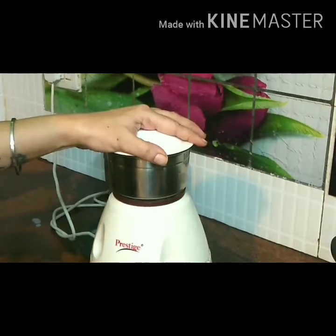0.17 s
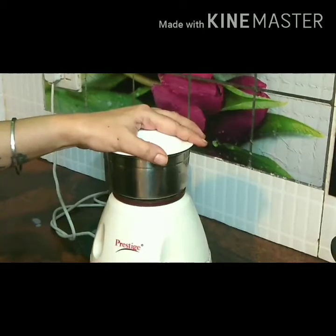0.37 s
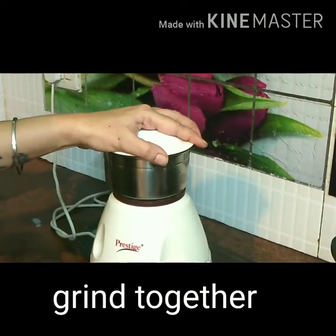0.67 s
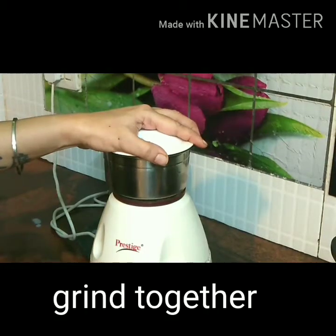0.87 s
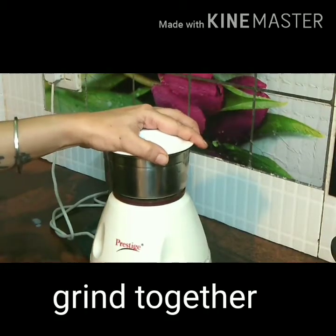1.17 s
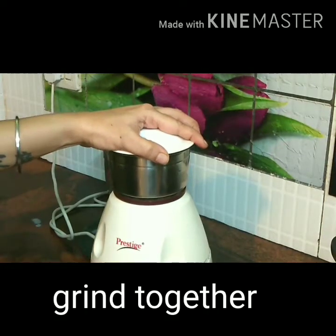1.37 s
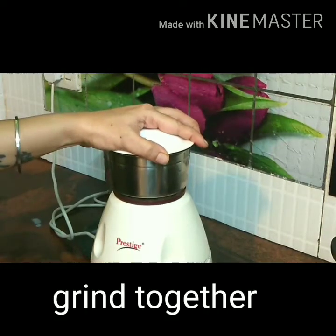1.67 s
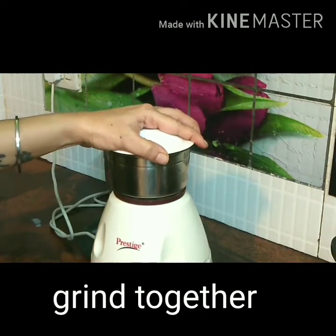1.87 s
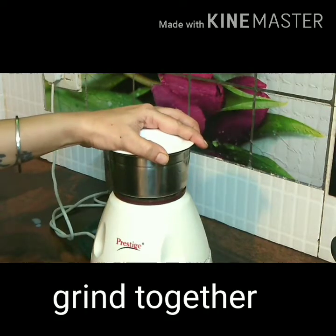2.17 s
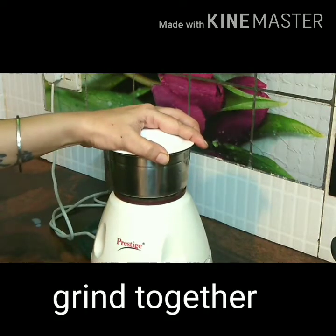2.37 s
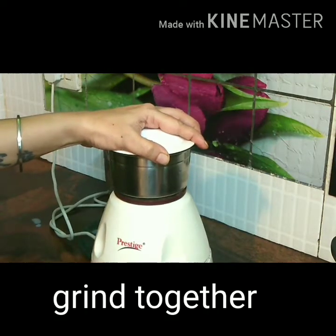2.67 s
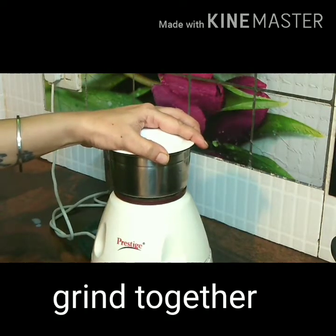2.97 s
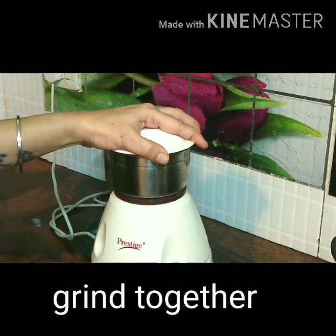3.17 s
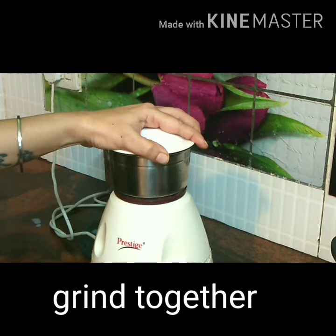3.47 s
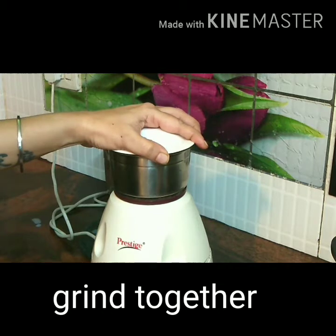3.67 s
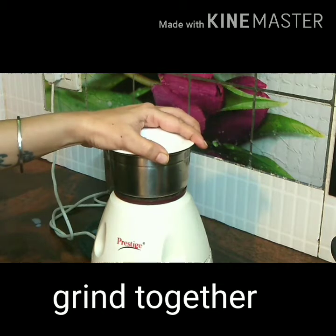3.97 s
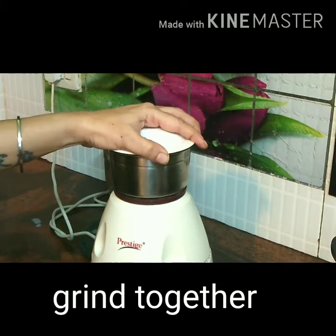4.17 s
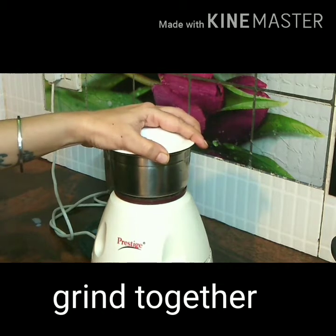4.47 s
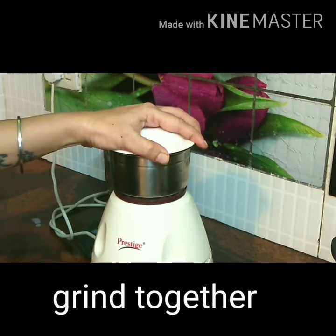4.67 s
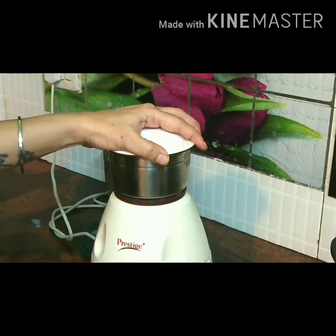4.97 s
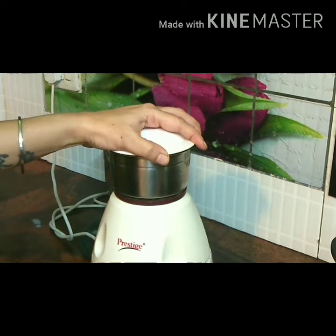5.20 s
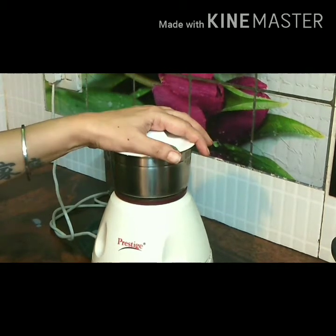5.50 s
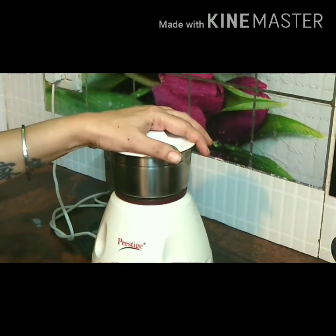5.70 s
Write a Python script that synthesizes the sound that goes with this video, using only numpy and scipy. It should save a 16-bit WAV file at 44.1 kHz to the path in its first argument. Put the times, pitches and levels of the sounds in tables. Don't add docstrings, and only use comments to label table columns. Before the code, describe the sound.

Four harsh bursts of a kitchen grinder, each longer until the last, churn wet leaves in a metal jar between faint ticks and hum.

```python
import sys
import numpy as np
from scipy import signal
from scipy.fft import rfft, irfft, next_fast_len
from scipy.io import wavfile
from scipy.ndimage import uniform_filter1d, map_coordinates

SR = 44100
rng = np.random.default_rng(int(sys.argv[2]) if len(sys.argv) > 2 else 0)


def level_to_linear(level):
    exponent = np.asarray(level, float) / 20
    return 10 ** exponent


def digitize_waveform(pressure):
    field = np.atleast_2d(pressure).T
    bounded = np.clip(field, -1, 1)
    quanta = np.round(bounded * 32767).astype(np.int16)
    wavfile.write(sys.argv[1], SR, quanta)


N = 257499
TIME_S = np.arange(N) / SR
FULL_SPEED_HZ = 250


def unit(x):
    return x / np.sqrt(np.mean(x ** 2) + 1e-20)


def along(points, hz):
    f, v = np.transpose(points)
    return np.interp(np.log(hz + 1), np.log(f + 1), v)


def curve(points, off):
    s, v = np.transpose(points)
    return np.interp(TIME_S, s, v, off, off)


def wobble(knots_per_s):
    coarse = np.arange(0, N + 16, 16)
    knots = rng.standard_normal(int(N * knots_per_s / SR) + 4)
    return np.interp(np.arange(N), coarse, map_coordinates(knots, [coarse * knots_per_s / SR]))


def filtered(x, response):
    m = next_fast_len(N + SR // 2)
    return irfft(rfft(x, m) * response(np.fft.rfftfreq(m, 1 / SR)), m)[:N]


def resonance(f, center_hz, width_hz):
    return 1j * f * width_hz / (center_hz ** 2 - f * f + 1j * f * width_hz)


# (top rumble of housing [dB], blade hiss re load [dB], counter thud [dB])
PULSE_LEVELS = [
    (-13, -10.5, -42.5),
    (-17, -9.5, -52),
    (-22, -8.5, -55),
    (-22.5, -8.5, -62.5),
]


def grinding(phase, speed_hz):
    pulse, load_db = blade_load()
    top_rumble_db, hiss_db, thud_db = np.transpose(PULSE_LEVELS)[:, pulse]
    lost_db = dying_db()
    level_db = load_db + lost_db
    surge = level_to_linear(level_db + 0.26 * wobble(14))
    in_step = churn(phase) + rumble(phase, load_db, top_rumble_db) + hiss(phase, speed_hz, load_db, hiss_db)
    return surge * in_step + thud(phase, load_db, lost_db, thud_db) + after_ring(level_db - 3.5)


# (time [s], load [dB])
LOAD = [
    [(1.028, -31), (1.046, -16.5), (1.081, -23), (1.1, -15.5), (1.165, -15.5), (1.185, -17), (1.291, -23),
     (1.355, -16), (1.39, -19)],
    [(2.357, -29.5), (2.385, -30.5), (2.447, -12.5), (2.493, -12), (2.633, -11), (2.72, -12)],
    [(3.139, -36.5), (3.179, -32), (3.24, -13.5), (3.297, -13), (3.663, -12), (3.919, -15), (3.97, -20.5),
     (4.02, -22)],
    [(4.386, -38), (4.45, -21), (4.538, -13), (4.588, -19), (4.616, -13.5), (4.886, -13), (4.92, -15.5),
     (5.254, -15), (5.839, -19.5)],
]


def blade_load():
    starts_s = [rows[0][0] for rows in LOAD]
    pulse = np.maximum(np.searchsorted(starts_s, TIME_S) - 1, 0)
    held_db = [np.interp(TIME_S, *np.transpose(rows), left=-120) for rows in LOAD]
    return pulse, np.choose(pulse, held_db)


def coasting():
    since_s = np.zeros(N)
    for now, following in zip(LOAD, LOAD[1:]):
        stop_s, next_s = now[-1][0], following[0][0]
        since_s += np.where((TIME_S > stop_s) & (TIME_S < next_s), TIME_S - stop_s, 0)
    return since_s


def dying_db():
    db_per_s, eases_s = 179.5, 1
    since_s = coasting()
    return -db_per_s * since_s / (1 + since_s / eases_s)


# (frequency [Hz], width [Hz], level [dB])
JAR_MODES = [(369.6, 54, 7), (571, 11, 5.5), (703, 15, 4.5), (888, 10.6, 9), (1141.3, 16.7, 13),
             (1263, 37, 6.5), (1550, 16, -1.5), (1550, 30, 1), (1655, 21, -22), (1770, 12, 7),
             (2218, 150, 4), (2451, 36, 8.5), (3513, 27, 7.5), (3840, 36, 5.5), (4130, 3.7, 9.5),
             (4350, 32, 5.5)]


def jar(f):
    return 1 + sum((level_to_linear(db) - 1) * resonance(f, hz, width_hz) for hz, width_hz, db in JAR_MODES)


def pulp(phase, spectrum, beat, spiky_db, lumps_db):
    driven = np.exp(-coasting() / 0.11)
    sizes = level_to_linear(spiky_db * driven * rng.exponential(size=N))
    sweep = 1 + beat * driven * np.cos(2 * phase + wobble(20))
    hits = rng.standard_normal(N) * sizes * sweep * level_to_linear(lumps_db * wobble(35))
    hits = hits / np.sqrt(np.abs(uniform_filter1d(hits ** 2, SR // 5)))
    low_hz = spectrum[0][0]
    return unit(filtered(hits, lambda f: level_to_linear(along(spectrum, f)) * jar(f) * np.minimum(f / low_hz, 1)))


# (frequency [Hz], density [dB/Hz])
CHURN_SPECTRUM = [(500, -17.5), (850, -2.5), (1040, 0), (1130, -1), (1390, 2), (1530, 7), (3200, -12),
                  (4160, -54), (7040, -120)]


def churn(phase):
    clear_s, clear_db, clear_takes_s = 5.33, -4, 0.036
    thin_db = clear_db * np.clip((TIME_S - clear_s) / clear_takes_s, 0, 1)
    return level_to_linear(thin_db) * pulp(phase, CHURN_SPECTRUM, beat=0.3, spiky_db=2, lumps_db=0.78)


# (frequency [Hz], density [dB/Hz])
RUMBLE_SPECTRUM = [(160, -29), (270, -19.5), (355, -9), (443, -6.5), (693, -3), (768, -6), (1050, -9.5),
                   (1360, -30.5), (2310, -120)]


def rumble(phase, load_db, top_db):
    knee_db = 7
    level_db = -knee_db * np.logaddexp(0, (load_db - top_db) / knee_db)
    return level_to_linear(level_db) * pulp(phase, RUMBLE_SPECTRUM, beat=0.12, spiky_db=1.5, lumps_db=-1.0)


LOUD_LOAD_DB = -18.5
# (frequency [Hz], density [dB/Hz])
HISS_SPECTRUM = [(1590, -13.5), (2700, -1.5), (2970, -2.5), (3940, -2), (4270, -5), (5450, -8.5),
                 (10400, -7), (14900, -17.5), (15800, -17.5)]


def hiss(phase, speed_hz, load_db, hiss_db):
    steady_share, light_load_db, speed_power = 0.14, -25.5, 0.14
    spray = pulp(phase, HISS_SPECTRUM, beat=0.12, spiky_db=2, lumps_db=0.86)
    spray = darkened(spray, db_per_s=41.5, steep=2.2, patchy_db=1.16)
    evened_db = steady_share * (np.maximum(load_db, light_load_db) - LOUD_LOAD_DB)
    level_db = hiss_db + 2.5 - evened_db + 0.53 * wobble(6.3)
    return level_to_linear(level_db) * (speed_hz / FULL_SPEED_HZ) ** speed_power * spray


def darkened(x, db_per_s, steep, patchy_db):
    hz, t, z = signal.stft(x, SR, nperseg=256)
    since_s = np.interp(t, TIME_S, coasting())
    patches = uniform_filter1d(rng.standard_normal(z.shape), size=9, axis=0)
    patches = unit(uniform_filter1d(patches, size=16, axis=1))
    gain_db = patchy_db * patches - db_per_s * since_s * (hz[:, None] / 10000) ** steep
    return signal.istft(z * level_to_linear(gain_db), SR, nperseg=256)[1][:N]


# (frequency [Hz], density [dB/Hz])
THUD_SPECTRUM = [(18, -51.5), (30, -17), (65, 3), (114, -1.5), (163, -22), (194, -4), (270, -4), (350, -35),
                 (590, -120)]


def thud(phase, load_db, lost_db, thud_db):
    level_db = thud_db + 0.3 * (load_db - LOUD_LOAD_DB) + 0.76 * lost_db + 1.5 * wobble(11)
    shake = pulp(phase, THUD_SPECTRUM, beat=.01, spiky_db=-9.0, lumps_db=0.0)
    return (load_db > -100) * level_to_linear(level_db) * shake


# (frequency [Hz], width [Hz], level [dB])
FREE_MODES = [(864, 14, 5.5), (1130, 31, -6), (1535, 13, 1), (1870, 15, -25.5), (3950, 14, -23)]


def after_ring(level_db):
    tones = lambda f: sum(level_to_linear(db) * resonance(f, hz, width_hz) for hz, width_hz, db in FREE_MODES)
    free = 1 - np.exp(-coasting() / 0.076)
    return level_to_linear(level_db) * free * unit(filtered(rng.standard_normal(N), tones))


# (time [s], speed [turns/s])
SPEED = [
    [(1.03, 21), (1.2, 78), (1.3, 60), (1.4, 60), (1.7, 14)],
    [(2.36, 20), (2.75, 130), (3.1, 30)],
    [(3.14, 21), (3.33, 113), (3.47, 161), (3.54, 170), (3.76, 185), (3.82, 170), (3.96, 101), (4.03, 70),
     (4.3, 30)],
    [(4.39, 30), (4.48, 120), (4.58, 177), (4.69, 211), (4.83, 231), (5.04, 248.5), (5.33, 266.5),
     (5.58, 265.5), (5.839, 218)],
]


def shaft_speed():
    return uniform_filter1d(curve(sum(SPEED, []), off=10), size=SR // 25)


def shaft_phase(speed_hz):
    return 2 * np.pi * np.cumsum(speed_hz) / SR


ORDERS = [
    1,
    2,
    3,
    4,
    12,
    14,
    24,
]
ORDER_DB = [-34.5, -44.5, -43.5, -44.5, -48, -48, -52]
ORDER_SPEED_POWER = [2.6, 2, 2.5, 3, .3, 2, .3]
# (gain while the motor pulls, loss while it sags [dB])
ORDER_PULL_DB = [0, 4, 3, 5, 15, -3, 5]
# (frequency [Hz], width [Hz], level [dB])
HOUSING_MODES = [(358, 14, 18), (462, 14, 13), (494, 12, 20), (533, 8, 18), (557, 12, 12), (695, 18, 22),
                 (782, 16, 16), (985, 30, 16), (2000, 150, 4), (2480, 160, 14), (3275, 45, 17),
                 (4800, 600, 10), (6050, 350, 10)]


def whine(phase, speed_hz):
    audible_hz, pull_hz_per_s = 100, 200
    fade = level_to_linear(dying_db()) / (1 + (audible_hz / speed_hz) ** 6)
    pull = np.tanh(np.gradient(speed_hz) * SR / pull_hz_per_s)
    flutter_rad = .045 * wobble(70) + .13 * wobble(18)
    tones = []
    for k, db, power, pull_db in zip(ORDERS, ORDER_DB, ORDER_SPEED_POWER, ORDER_PULL_DB):
        level_db = db + pull_db * pull + 3 + 2.8 * np.log(k) ** .5 * wobble(25)
        tone = np.sin(k * (phase + flutter_rad))
        tones.append(level_to_linear(level_db) * tone * (speed_hz / FULL_SPEED_HZ) ** power)
    housing = lambda f: 1 + sum(level_to_linear(db) * resonance(f, hz, width_hz) for hz, width_hz, db in HOUSING_MODES)
    return fade * tones[0] + filtered(fade * sum(tones[1:]), housing)


def clicks(events, spread, snap):
    out, t = np.zeros(N + SR), np.arange(8192) / SR
    f = np.fft.rfftfreq(len(t), 1 / SR)
    for s, db, hz, t60_s in events:
        blow = snap * (t == 0)
        burst = (rng.standard_normal(len(t)) + blow) * level_to_linear(-60 * t / max(t60_s, .002))
        burst = irfft(rfft(burst) * resonance(f, hz, spread * hz) ** 2)
        out[round(s * SR):][:len(t)] += level_to_linear(db) * burst / np.abs(burst).max()
    return out[:N]


# (time [s], peak [dB], pitch [Hz], t60 [s])
BUMPS = [(.699, -41, 620, .04), (1.029, -29, 900, 0.0414), (3.035, -41.5, 597, 0.057), (4.3, -45, 550, .05),
         (1.043, -10, 970, 0.077), (1.044, -17, 443, 0.046), (1.105, -10, 410, 0.058),
         (1.127, -9.5, 391, 0.11)]
# (time [s], peak [dB], pitch [Hz], t60 [s])
COUNTER_KNOCK = [(5.332, -24, 120, 0.034)]


def lurches():
    return clicks(BUMPS, spread=0.4, snap=26) + clicks(COUNTER_KNOCK, spread=3.9, snap=16)


# (time [s], peak [dB], pitch [Hz], t60 [s])
CRACKS = [(1.0284, -27, 6020, 0.015), (1.042, -17, 9180, 0.015), (1.0861, -2.5, 7900, 0.015),
          (1.1035, -6, 7650, 0.015), (1.1914, -17, 9240, 0.015), (1.3523, -8.5, 9250, 0.015),
          (1.3648, -16.5, 6810, 0.015), (2.3605, -21.5, 9100, 0.015), (2.6494, -7, 8650, 0.015),
          (3.1398, -30.5, 9900, 0.015), (3.22, -21, 9300, 0.015), (4.3864, -47, 6000, 0.015),
          (4.3954, -26.5, 7500, 0.015), (5.6366, -4.5, 12600, 0.015), (5.6973, -11, 9700, 0.015)]
# (time [s], peak [dB], pitch [Hz], t60 [s])
TICKS = [(1.7787, -26, 14300, 0.0033), (1.779, -41, 5860, .008), (1.779, -46, 8300, .004),
         (1.779, -52, 3700, .004), (1.8182, -38, 10200, .004), (1.8545, -49, 11000, .004),
         (1.9044, -53, 13800, .004), (1.9617, -45, 10400, .005), (2.0155, -53, 12600, .004),
         (2.0195, -52, 10270, .004), (2.9274, -46, 6430, .02), (2.9274, -51, 14700, 0.022),
         (3.12, -47, 3080, 0.075)]
# (time [s], peak [dB], pitch [Hz], t60 [s])
KNOCKS = [(0.3132, -46, 2170, 0.09), (0.486, -47.5, 2200, 0.083), (0.7936, -49, 2320, 0.09),
          (1.8462, -45, 2340, 0.075), (1.8647, -39.5, 2320, 0.09), (3.12, -49, 1770, 0.09),
          (4.3, -48.5, 2930, 0.09)]


def small_clicks():
    cracks = clicks(CRACKS, spread=0.91, snap=0.75)
    ticks = clicks(TICKS, spread=0.19, snap=6)
    return cracks + ticks + clicks(KNOCKS, spread=0.53, snap=.5)


# (frequency [Hz], t60 [s])
WALL_DECAY = [(200, 0.46), (1500, .45), (6000, 0.3), (15000, .15)]


def walls(x):
    hz, t, z = signal.stft(rng.standard_normal(SR // 2), SR, nperseg=256)
    decay_db = -60 * t / along(WALL_DECAY, hz)[:, None]
    tail = signal.istft(z * level_to_linear(decay_db), SR, nperseg=256)[1]
    delayed = np.pad(x, (70, 0))
    return signal.fftconvolve(delayed, tail / np.linalg.norm(tail))[:N]


# (frequency [Hz], density [dB/Hz])
KITCHEN_SPECTRUM = [(12, -67), (20, -22), (85, 0.5), (153, -40), (187, 1), (254, -14.5), (300, -2),
                    (419, -3.5), (524, 1), (1510, -11), (2370, -15.5), (2880, -22), (3130, -20.5),
                    (4140, -26.5), (15800, -29)]
# (frequency [Hz], level [dB])
HUM_TONES = [(86.1, -74.5), (694.4, -70), (2116, -81.5), (2315, -72), (2363, -66.5), (2412, -77),
             (2460, -81), (3101, -78)]


def kitchen():
    air = unit(filtered(rng.standard_normal(N), lambda f: level_to_linear(along(KITCHEN_SPECTRUM, f))))
    murmur = level_to_linear(-53.5 + .45 * wobble(7)) * air
    for hz, db in HUM_TONES:
        level = level_to_linear(db + 0.5 + 1.6 * wobble(24))
        murmur = murmur + level * np.sin(2 * np.pi * hz * TIME_S + .9 * wobble(16))
    return murmur


# (time [s], gain [dB])
DUCKING = [(0, 0), (1.03, 0), (1.4, -3), (1.7, 0), (2.36, 0), (2.75, -6), (3.14, -4.5), (4, -9), (4.38, -8),
           (5.84, -10)]


def ducked(background):
    return level_to_linear(curve(DUCKING, off=-10)) * background


def scene():
    speed_hz = shaft_speed()
    phase = shaft_phase(speed_hz)
    small = small_clicks()
    echo = level_to_linear(-12) * walls(small)
    near = grinding(phase, speed_hz) + whine(phase, speed_hz) + lurches() + small + echo
    return (near + ducked(kitchen()))[None]


def top_cut(x):
    return signal.sosfilt(signal.butter(12, 16670, fs=SR, output="sos"), x)


def record(dry):
    top_hz, slope_hz, bass_hz = 15560, 120, 25
    soft = dry / (1 + np.abs(dry / .82) ** 7) ** (1 / 7)
    low_pass = lambda f: np.sin(np.pi / 2 * np.clip((top_hz - f) / slope_hz, 0, 1)) ** 2
    high_pass = lambda f: 1j * f / (bass_hz + 1j * f)
    mix = filtered(soft[0], lambda f: low_pass(f) * high_pass(f))[None]
    return top_cut(mix)


dry = scene()
out = record(dry)
digitize_waveform(out)
```